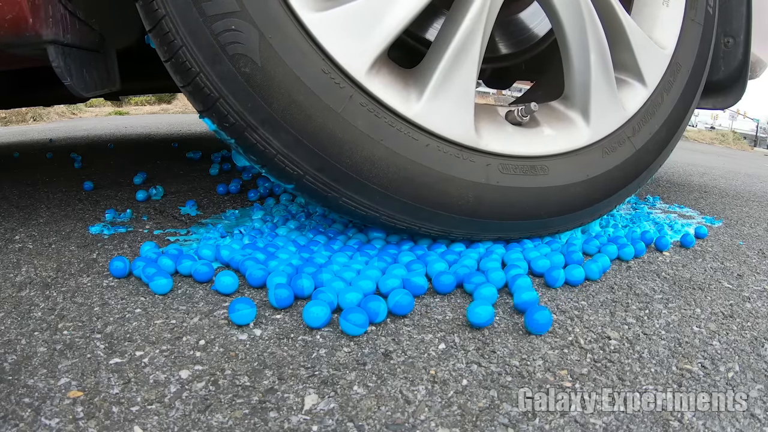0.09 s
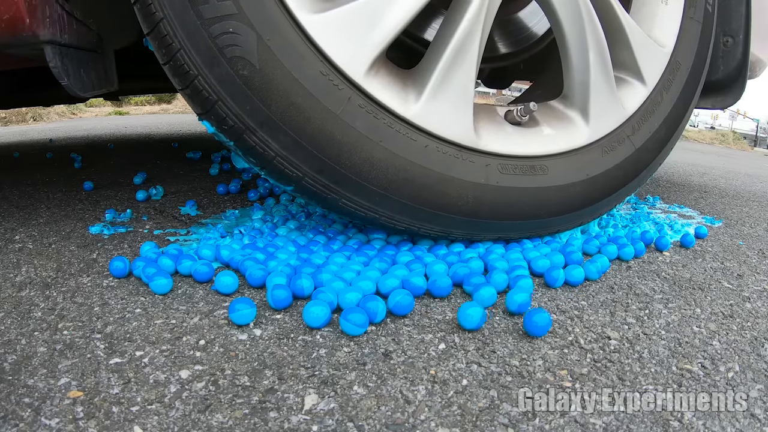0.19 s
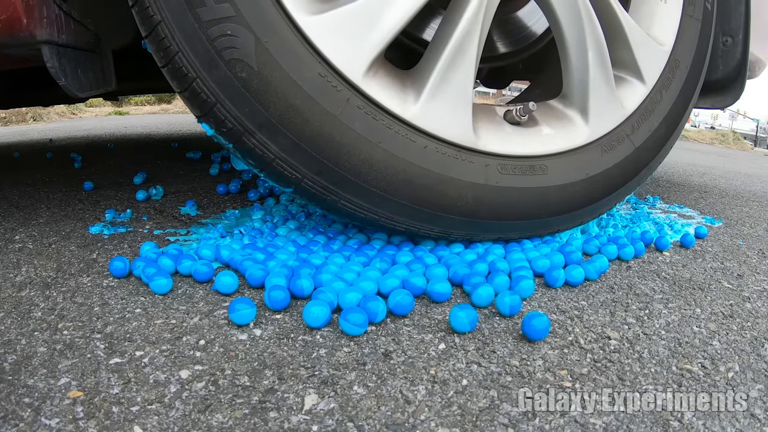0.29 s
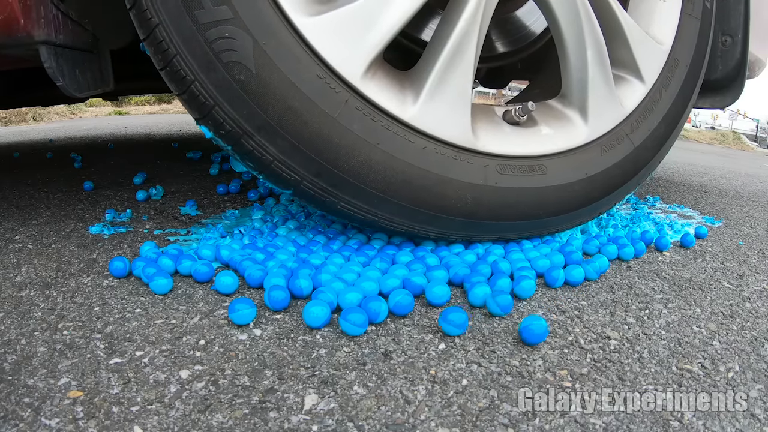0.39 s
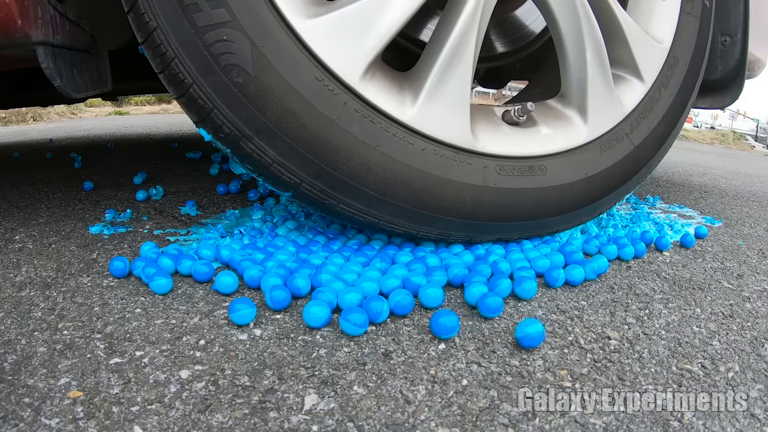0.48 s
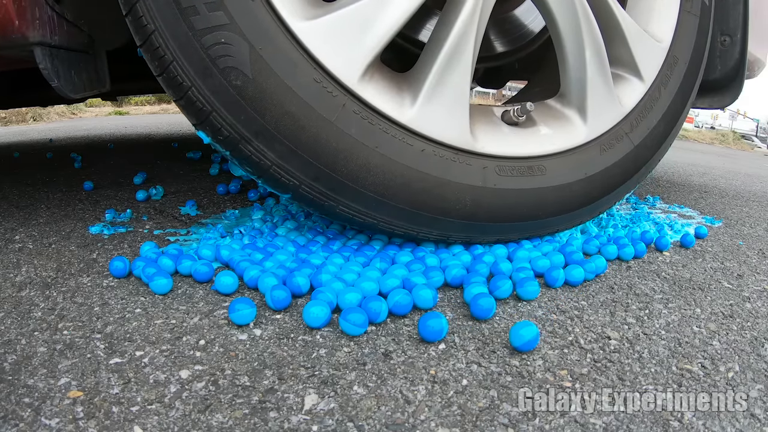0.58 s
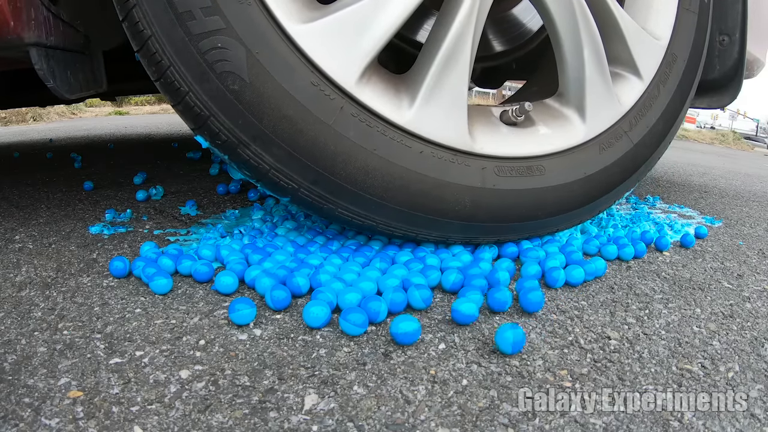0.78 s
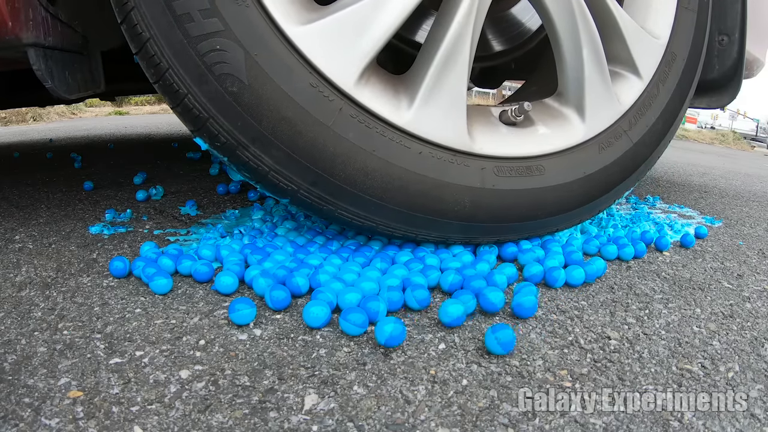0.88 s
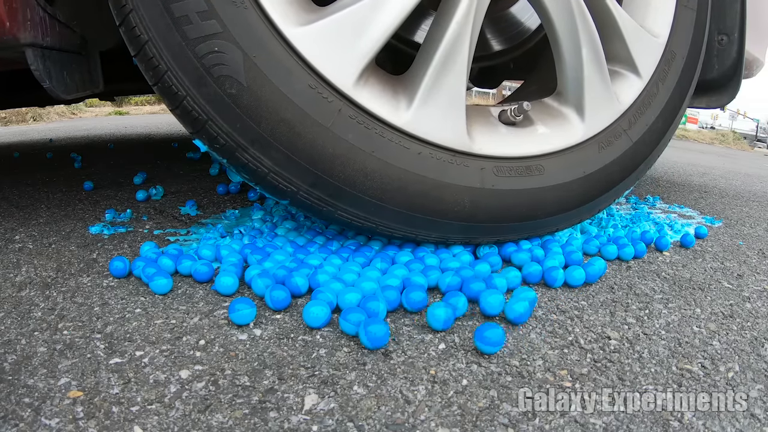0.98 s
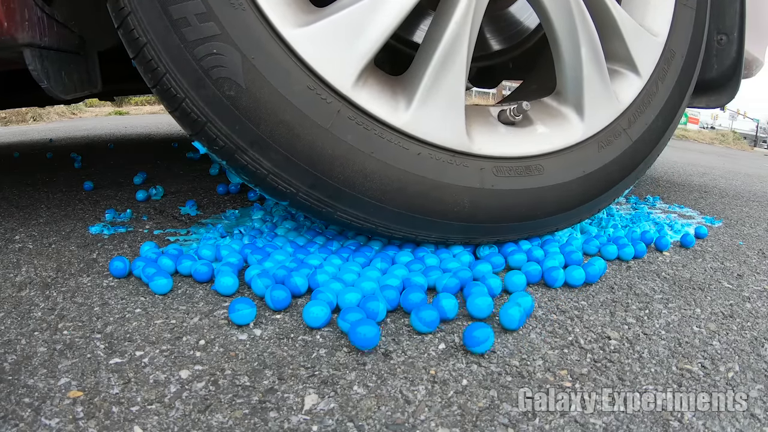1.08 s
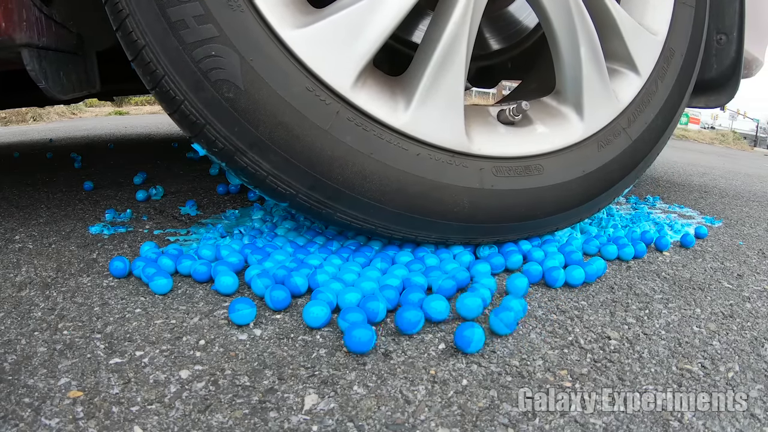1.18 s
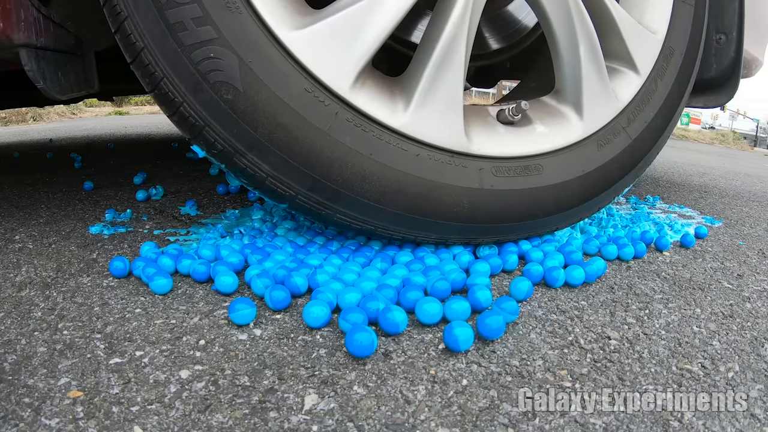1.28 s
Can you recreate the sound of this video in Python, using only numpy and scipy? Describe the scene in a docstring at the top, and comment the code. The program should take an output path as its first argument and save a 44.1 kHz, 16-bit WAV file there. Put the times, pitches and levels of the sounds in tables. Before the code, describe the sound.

A car tyre crushes a heap of little brittle balls, snapping in bursts over low rumble

```python
"""Tyre crushing paintballs

A car tyre creeps over a heap of paintballs on asphalt, close by. Shells burst with a snap pulse and a short ring,
and low damped tones make the tyre thud down after them. Shaped noise makes the hiss of paint, small grains crunch,
and squeezed balls tick. Underneath lie the car's noise rumble and wavering hum, and a faintly singing wheel.
Scattered, fading reflections come back from the wheel and underbody and from the open lot."""
import sys
import numpy as np
from scipy import signal
from scipy.io import wavfile
from scipy.ndimage import uniform_filter1d

SR = 44100
rng = np.random.default_rng(int(sys.argv[2]) if len(sys.argv) > 2 else 0)


def waveform_to_disk(signal):
    """Save audio, clipped to [-1, 1], as 16-bit WAV at the path in sys.argv[1]."""
    frames = np.transpose(np.atleast_2d(signal))
    scaled = np.clip(frames, -1, 1) * 32767
    samples = np.round(scaled).astype(np.int16)
    wavfile.write(sys.argv[1], SR, samples)


N = 59535
T = np.arange(N) / SR  # time in s


def amp(db):
    """Turns decibels into a gain."""
    return 10 ** (np.asarray(db) / 20)


def unit(x):
    """Scales a sound to an average (rms) strength of 1."""
    return x / np.sqrt(np.mean(x ** 2) + 1e-20)


def curve(points):
    """Draws straight lines between (time, value) points over the whole scene."""
    return np.interp(T, *np.transpose(points))


def add(mix, s, sound):
    """Adds a sound into the mix at time s."""
    part = mix[..., max(round(s * SR), 0):][..., :sound.shape[-1]]
    part += sound[..., :part.shape[-1]]


def colour(x, points):
    """Filters a sound through (Hz, dB) points, with no response before the sound itself (minimum phase)."""
    size = 2 * x.shape[-1]
    hz, db = np.transpose(points)
    bins = abs(np.fft.fftfreq(size, 1 / SR)) + 1
    log_gain = np.log(amp(np.interp(np.log(bins), np.log(hz), db)))
    response = np.exp(np.conj(signal.hilbert(log_gain)))
    return np.fft.ifft(np.fft.fft(x, size) * response).real[..., :size // 2]


def fade(t, t60):
    """Starts at t = 0 and dies away by 60 dB in t60 seconds."""
    return (t >= 0) * np.exp(-np.log(1000) * np.maximum(t, 0) / t60)


def ring(t, hz, t60):
    """One damped tone, as from a struck object."""
    return np.sin(2 * np.pi * hz * t) * fade(t, t60)


def pan(x, db):
    """Places a sound between left and right; positive dB leans left."""
    return np.array([amp(db / 2) * x, amp(-db / 2) * x])


def spread(pair, width):
    """Turns two unrelated signals into left and right of a given width."""
    middle, side = pair[0], width * pair[1]
    return np.array([middle + side, middle - side]) / np.sqrt(1 + width ** 2)


SNAP_LOW_HZ = 184  # the snap keeps only what lies above this
SWELL_S, SWELL_DB = 0.00068, -6.5  # the shell bulges just before it gives way
GAP_T60, GAP_DB = 0.019, -6  # the hollow wedge of air between tyre and road
THUD_HZ, THUD_T60 = 103.3, 0.063
CRACK_DB, CRACK_T60 = 5.5, 0.0081  # crack level is relative to the splinters
SHELL_RISE_S, SPLINTER_T60 = 0.00042, 0.016
# Bursting shells: t/s, snap level/dB, snap width/ms, shell f/Hz, shell ring level/dB,
# hollow f/Hz, crack f/Hz, splinter level/dB, thud level/dB, left-right balance/dB
BURSTS = [(0.2026, -5.5, 0.16, 1542, -3, 515, 1960, -18, -17.5, -2.0),
          (0.2036, -14, 0.48, 2101, -15.5, 576, 5200, -27, -40.5, 1.5),
          (0.362, -6, 0.13, 1103, -10.5, 494, 2467, -24, -38, -3.5),
          (0.3944, -11.5, 0.34, 1592, -18, 719, 3170, -36, -23, 0.0),
          (0.432, -11.5, 0.52, 1418, -17.5, 528, 1700, -29.5, -20, -0.5),
          (0.4446, -11.5, 0.24, 1263, -13.5, 560, 3197, -31.5, -16.5, 0),
          (0.4768, -8, 0.63, 650, -13.5, 530, 1750, -32.5, -33.5, -2),
          (0.4795, -14.5, 0.55, 1396, -9.5, 363, 1700, -24, -29.5, -0.5),
          (0.4821, -10, 0.18, 1507, -13.5, 500, 2260, -24, -16, -1),
          (0.4953, -5.5, 0.55, 504, -32.5, 475, 3459, -31.5, -15, -4),
          (0.4969, -7.5, 0.27, 2133, -19, 246, 1748, -26, -25.5, -4),
          (0.5213, -16, 0.13, 1585, -17, 443, 2139, -33.5, -21.5, -2.0),
          (0.5609, -16, 0.15, 1496, -15.5, 360, 2062, -24, -15, -1.5),
          (0.6997, -6.5, 0.34, 1627, -28, 466, 1700, -19.5, -23, -0.5),
          (0.7052, -8, 0.45, 1513, -11, 337, 1740, -21.5, -33, -3),
          (0.8023, -6.5, 0.16, 1228, -7.5, 584, 2110, -19, -18, 1.0),
          (0.842, -7, 0.14, 1732, -12, 532, 1830, -24.5, -21.5, -0.5)]


def bursts():
    """Each shell bulges, gives way in one pressure pulse, rings, cracks into splinters and pushes the rubber."""
    out, lead = np.zeros((2, N)), .005  # lead leaves room for the bulge
    t = T[:SR // 14] - lead
    low_cut = signal.butter(2, SNAP_LOW_HZ, "high", fs=SR)
    for s, snap_db, width_ms, hz, ring_db, gap_hz, crack_hz, splinter_db, thud_db, pan_db in BURSTS:
        width = width_ms / 1000
        bulge = amp(SWELL_DB) * np.exp(-(t / SWELL_S + 1 / 2) ** 2)
        pulse = np.exp(-(t / width) ** 2) - bulge
        hollow = amp(GAP_DB) * ring(t + width, gap_hz, GAP_T60) * np.tanh((t + width) / width)
        snap = amp(snap_db) * (signal.lfilter(*low_cut, pulse) + hollow)
        shell_ring = amp(ring_db) * shell(t + width / 2, hz, SHELL_RISE_S)
        thud = amp(thud_db) * ring(t, THUD_HZ, THUD_T60)
        crack = amp(splinter_db + CRACK_DB) * ring(t, crack_hz, CRACK_T60)
        fragments = amp(splinter_db) * splinters(t, SPLINTER_T60)
        add(out, s - lead, pan(thud - snap - shell_ring + crack, pan_db) + fragments)
    return out


# Tones of one shell: f as a multiple of its pitch, level/dB, time to fall 60 dB/s
SHELL_MODES = [(1, 3, 0.007), (1.49, -20, 0.021), (.7, -7.5, 0.012), (.39, -8, 0.014)]


def shell(t, hz, rise):
    """The brief ring of one shell: several damped tones behind one smooth, quick onset."""
    onset = .5 + .5 * np.tanh(t / rise)
    tones = 0
    for multiple, db, t60 in SHELL_MODES:
        decay = np.exp(-np.log(1000) * t / t60)
        tones = tones + amp(db) * np.sin(2 * np.pi * hz * multiple * t) * decay
    return onset * tones


SPLINTER_RISE_S = 0.00045
# Tone colour of the tearing shell: f/Hz, level/dB
SPLINTER_TONE = [(200, -27), (900, 6.5), (2300, 11.5), (3000, 7), (4000, -1), (5200, 7), (5700, -6),
                 (7000, -9), (8500, -34.5)]


def splinters(t, t60):
    """A quick spray of tiny fractures, made from a fading burst of coloured noise."""
    noise = rng.standard_normal((2, len(t))) * fade(t, t60) * np.clip(t / SPLINTER_RISE_S, 0, 1)
    return spread(colour(noise, SPLINTER_TONE), width=0.62)


# Tones of the tyre: f/Hz, level/dB, time to fall 60 dB/s
TYRE_MODES = [(53, -0.5, 0.15), (108.8, -7.5, 0.58), (334.4, -21.5, 0.17)]
# The tyre dropping onto the road: t/s, level/dB
DROPS = [(0.202, -30.5), (0.4975, -14.5), (0.56, -24), (0.706, -32), (0.803, -26.5)]


def tyre():
    """The tyre booms in a few low damped tones as it sinks through the burst balls."""
    out = np.zeros(N)
    boom = sum(amp(db) * ring(T, hz, t60) for hz, db, t60 in TYRE_MODES)
    for s, db in DROPS:
        add(out, s, -amp(db) * boom)
    return out


TICK_RISE_S, TICK_SPLINTER_T60 = 0.00041, 0.017
KNOCK_HZ, KNOCK_T60 = 590, 0.0054
# Balls clicking together or just cracking: t/s, level/dB, f/Hz,
# splinter level/dB and knock level/dB (both relative to the tick's own level)
TICKS = [(0.016, -51.5, 2800, -3.5, -11.5), (.048, -39.5, 1610, -38, 5), (0.1279, -26.5, 1605, -44.5, 0),
         (0.143, -36.5, 1720, -28, -12), (0.161, -44, 2400, -5.5, -20), (0.181, -37, 1504, -9.5, 3),
         (0.327, -41, 1420, -10.5, 0), (.920, -37.5, 1380, -22.5, -17), (.962, -38, 1640, -14.5, -4),
         (1.0225, -36, 1315, -33, -6), (1.084, -39, 1360, -29, -8), (1.133, -34.5, 1460, -4.5, -4.5),
         (1.161, -39.5, 1320, -19, -26), (1.24, -45, 1730, -8, -21.5), (1.252, -35, 2950, -8.5, -23),
         (1.267, -37, 1350, -17, -29), (1.2933, -21, 1985, -13, -12)]


def ticks():
    """Squeezed balls slip, click against their neighbours and knock on the road."""
    out, lead = np.zeros((2, N)), .002  # lead leaves room for the smooth onset
    t = T[:SR // 20] - lead
    for s, db, hz, splinter_db, knock_db in TICKS:
        knock = amp(knock_db) * ring(t, KNOCK_HZ, KNOCK_T60) * np.tanh(t / TICK_RISE_S)
        click = shell(t, hz, TICK_RISE_S) + knock
        fragments = amp(splinter_db) * splinters(t, TICK_SPLINTER_T60)
        add(out, s - lead, amp(db) * (click + fragments))
    return out


SPRAY_RISE_S, SPRAY_T60 = 0.0053, 0.25
# Paint squirting out of a burst ball: t/s, level/dB
SPRAYS = [(0.481, -36), (0.553, -46.5), (0.825, -35.5), (0.857, -60)]
# Tone colour of the hiss: f/Hz, relative level/dB
SPRAY_TONE = [(300, -21.5), (1300, 15), (2600, -0.5), (5200, -7), (7000, -18.5), (8400, -24)]


def spray():
    """Paint hisses out briefly through the split shells: coloured noise that rises fast and fades."""
    level = np.zeros(N)
    for s, db in SPRAYS:
        level += amp(db) * np.clip((T - s) / SPRAY_RISE_S, 0, 1) * fade(T - s, SPRAY_T60)
    hiss = unit(colour(rng.standard_normal((2, N)), SPRAY_TONE))
    return level * spread(hiss, width=0.64)


CRUNCH_PER_S, CRUNCH_SPREAD_DB = 1600, 1  # average grains per second, and how much their sizes vary
# Fine crunch of the crushed shells: t/s, level/dB
CRUNCH_LEVEL = [(0, -50.5), (.17, -55), (.315, -70), (.365, -44), (.43, -35.5), (.51, -32), (.57, -57),
                (.78, -78), (.83, -36), (.9, -52.5), (1.35, -64.5)]
# Tone colour of the crunch: f/Hz, relative level/dB
CRUNCH_TONE = [(100, 6.5), (500, 21.5), (1400, 3.5), (2500, -6.5), (5000, -19.5), (8000, -39)]


def crunch():
    """Broken shells grind under the tread in many small grains at random moments."""
    sizes = amp(CRUNCH_SPREAD_DB * np.minimum(rng.exponential(1, (2, N)), 4))
    happens = rng.random((2, N)) < CRUNCH_PER_S / SR
    grains = sizes * happens * rng.choice([-1, 1], (2, N))
    return spread(unit(colour(grains, CRUNCH_TONE)), width=0.7) * amp(curve(CRUNCH_LEVEL))


# The wheel ringing on after each pop: f/Hz, level/dB, time to fall 60 dB/s
WHEEL_MODES = [(486.5, -64.5, 1.6), (510, -74.5, 1.0), (426, -64.5, 0.67)]


def wheel(dry):
    """Every pop feeds energy into the wheel, which sings on faintly as that energy drains away."""
    power = dry.mean(0) ** 2
    out = np.zeros(N)
    for hz, db, t60 in WHEEL_MODES:
        stored = abs(signal.fftconvolve(power, fade(T, t60) ** 2)[:N])  # energy still in this tone
        out += amp(db) * np.sqrt(stored) * np.sin(2 * np.pi * (hz * T + rng.random()))
    return out


def echoes(x, tone, t60, delay, width):
    """A delayed, dying scatter of reflections, made from coloured noise."""
    t = T[:SR // 2]
    taps = spread(rng.standard_normal((2, len(t))), width) * fade(t - delay, t60)
    tail = colour(taps / np.linalg.norm(taps[0]), tone)
    return signal.fftconvolve(x.mean(0)[None], tail, axes=1)[:, :N]


NEAR_DB, NEAR_T60, NEAR_DELAY_S, NEAR_WIDTH = -14.5, 0.064, 0.0039, 0.83
# Tone colour of reflections from wheel and underbody: f/Hz, relative level/dB
NEAR_TONE = [(60, -32.5), (200, 0), (450, 5), (1000, 0), (2200, -7), (4000, 2), (5200, -6), (8000, -3)]


def underbody(dry):
    """The nearby wheel and underbody throw the sound back soon and briefly."""
    return amp(NEAR_DB) * echoes(dry, NEAR_TONE, NEAR_T60, NEAR_DELAY_S, NEAR_WIDTH)


LOT_DB, LOT_T60, LOT_DELAY_S, LOT_WIDTH = -31, 0.13, 0.017, 0.22
# Tone colour of reflections from the open lot: f/Hz, relative level/dB
LOT_TONE = [(60, -8), (450, 12), (1000, 8), (2200, 3), (4000, 11), (6500, 4.5), (8500, 8)]


def open_lot(dry):
    """The open lot answers later, and its reflections last longer."""
    return amp(LOT_DB) * echoes(dry, LOT_TONE, LOT_T60, LOT_DELAY_S, LOT_WIDTH)


RUMBLE_SWELL_DB = 4.05  # rms size of the random swelling
# Tone colour of the car's rumble: f/Hz, relative level/dB
RUMBLE_TONE = [(20, -2), (40, 0), (62, 4), (80, -8.5), (112, -8.5), (160, -18), (320, -25), (480, -27.5),
               (750, -33), (1500, -35), (2600, -47.5), (8400, -81), (16000, -89)]
# Left-right difference of the rumble, against its middle: f/Hz, level/dB
RUMBLE_SIDE = [(40, -16.5), (150, -19), (400, -3.5), (2000, -9.5), (6000, 6)]
# Rumble loudness before the random swelling: t/s, level/dB
RUMBLE_LEVEL = [(0, -44), (.25, -37), (.6, -39), (.85, -37), (1.1, -39.5), (1.35, -36.5)]
# Hum of the running car: f/Hz, width of its wavering/Hz, level/dB
HUM = [(110.56, 3.5, -50.5), (314, 4.7, -65.5)]


def car():
    """Low coloured noise that swells at random, with a few hum tones that waver in pitch."""
    middle, side = colour(rng.standard_normal((2, N + SR // 2)), RUMBLE_TONE)
    side = colour(side, RUMBLE_SIDE)
    rumble = unit(np.array([middle + side, middle - side])[:, -N:])  # skips the filter's start-up
    slow_noise = uniform_filter1d(rng.standard_normal(N), size=3000)
    swell = unit(uniform_filter1d(slow_noise, size=3000))
    out = amp(curve(RUMBLE_LEVEL) + RUMBLE_SWELL_DB * swell) * rumble
    for hz, width, db in HUM:
        drift = unit(uniform_filter1d(rng.standard_normal(N), size=2000))
        cycles = np.cumsum(hz + width / 2 * drift) / SR
        out += amp(db) * unit(np.sin(2 * np.pi * cycles))
    return out


def scene():
    """The crushing, its reflections, the singing wheel, the tyre thuds and the car."""
    dry = bursts() + ticks() + spray() + crunch()
    return dry + underbody(dry) + open_lot(dry) + wheel(dry) + tyre() + car()


OVERLOAD, CUT_HZ = .94, 8400  # overload is a fraction of full scale


def record(dry):
    """Rounds off peaks near the overload level, then removes the highest treble."""
    rounded = dry / (1 + (dry / OVERLOAD) ** 6) ** (1 / 6)
    taps = signal.firwin(127, CUT_HZ, window=("kaiser", 9), fs=SR)
    return signal.oaconvolve(rounded, taps[None], "same")


dry = scene()
out = record(dry)
waveform_to_disk(out)
```